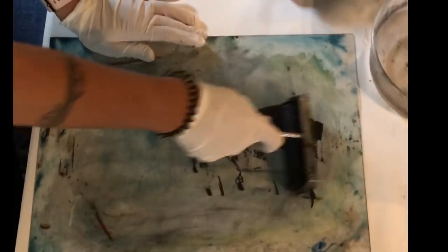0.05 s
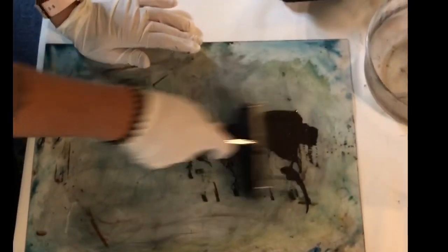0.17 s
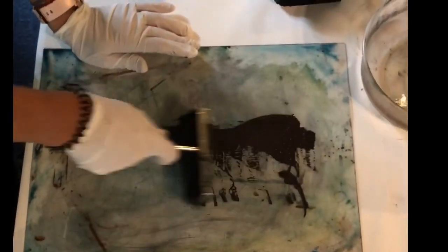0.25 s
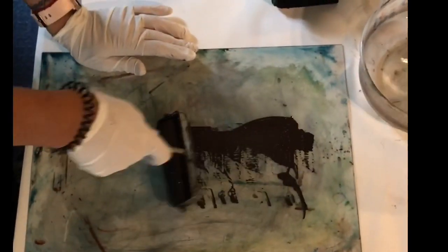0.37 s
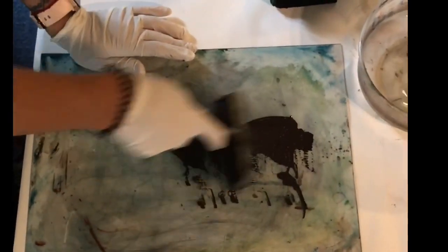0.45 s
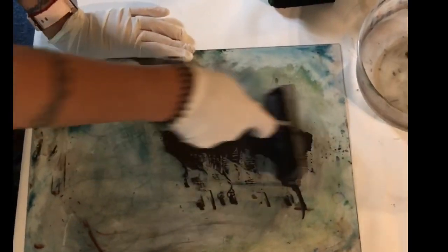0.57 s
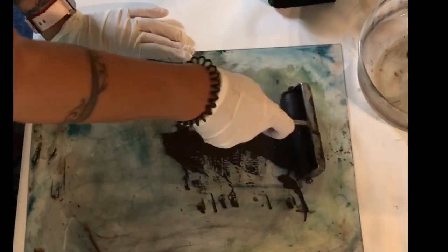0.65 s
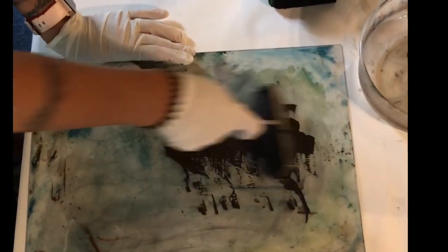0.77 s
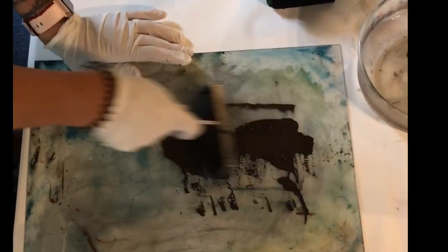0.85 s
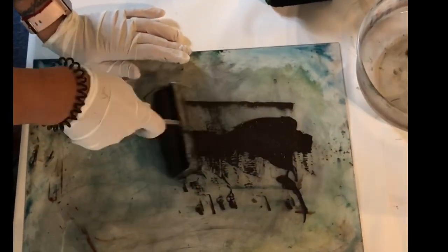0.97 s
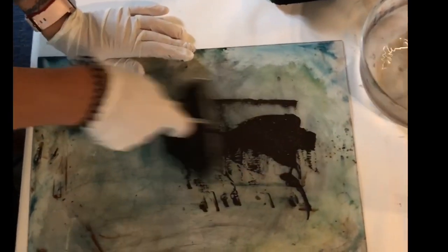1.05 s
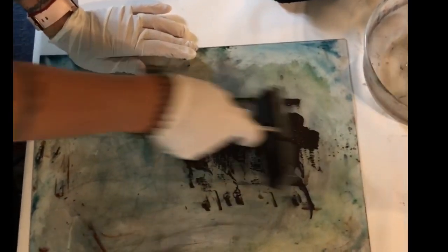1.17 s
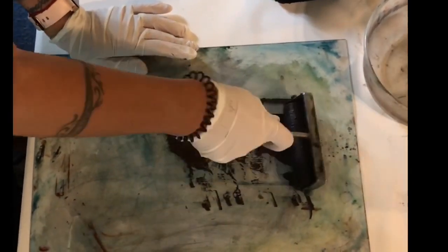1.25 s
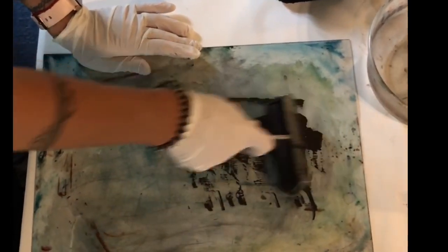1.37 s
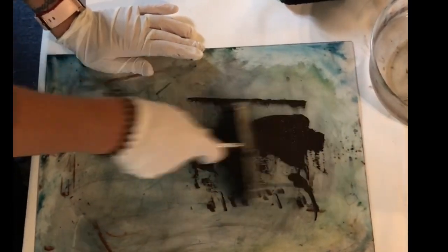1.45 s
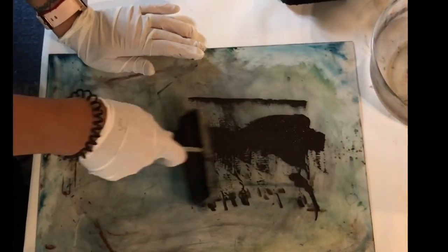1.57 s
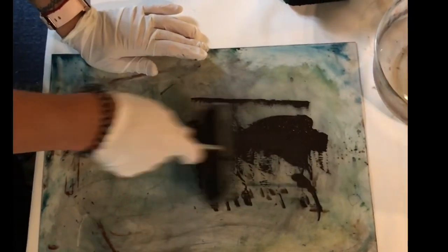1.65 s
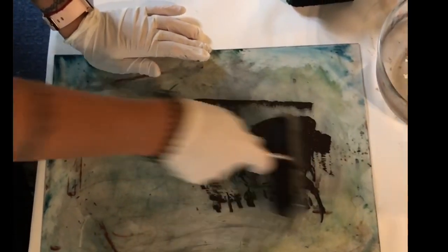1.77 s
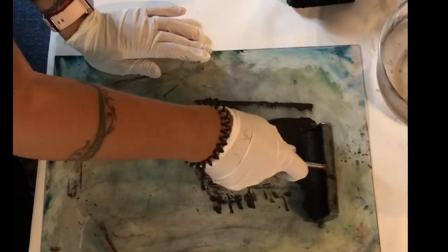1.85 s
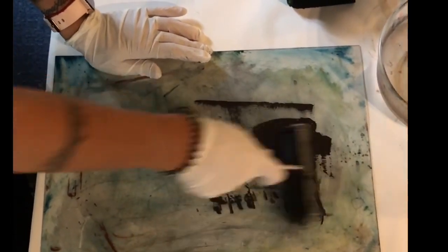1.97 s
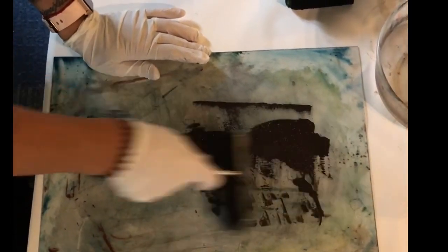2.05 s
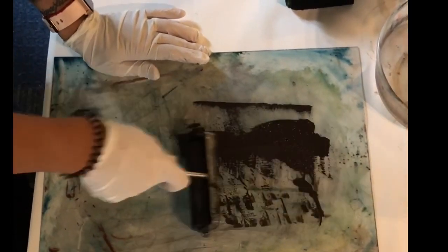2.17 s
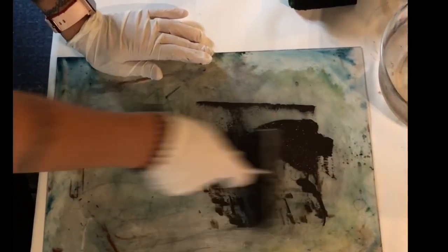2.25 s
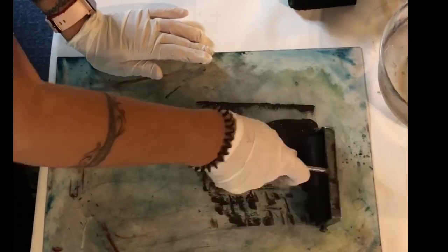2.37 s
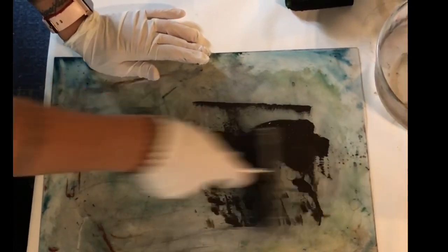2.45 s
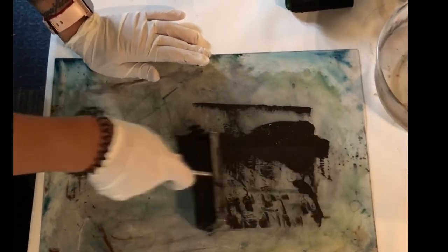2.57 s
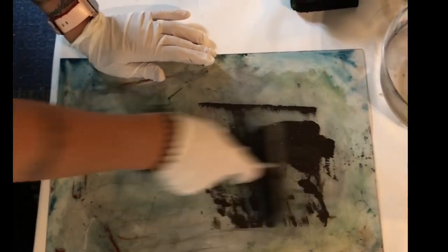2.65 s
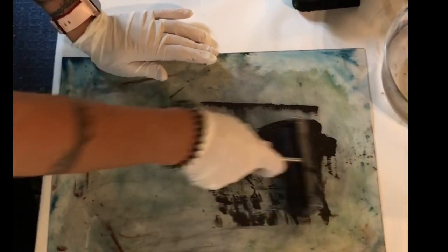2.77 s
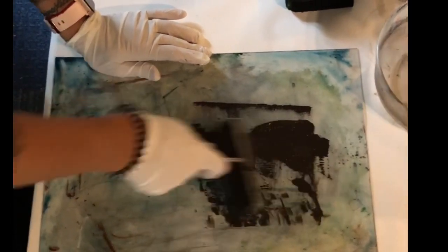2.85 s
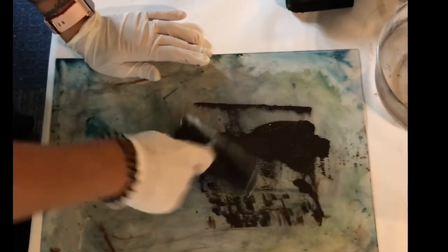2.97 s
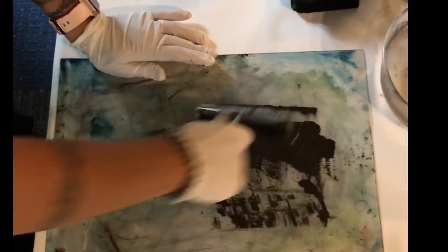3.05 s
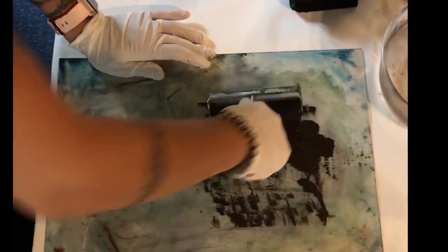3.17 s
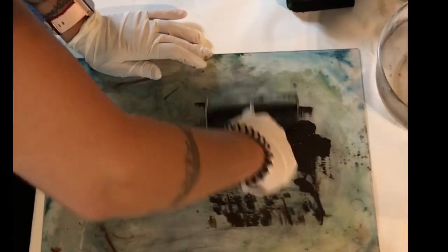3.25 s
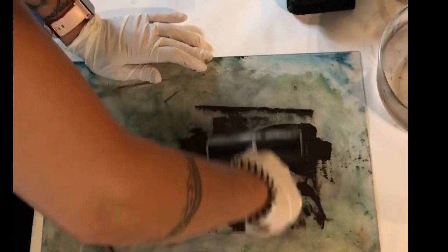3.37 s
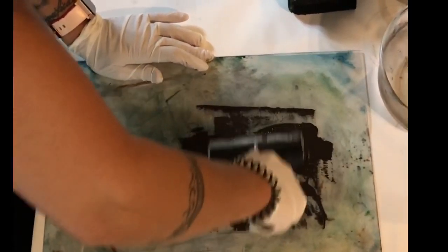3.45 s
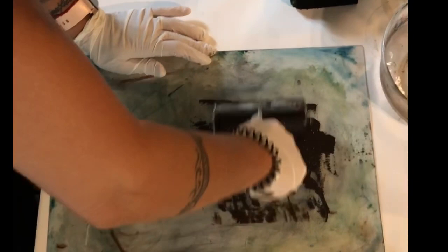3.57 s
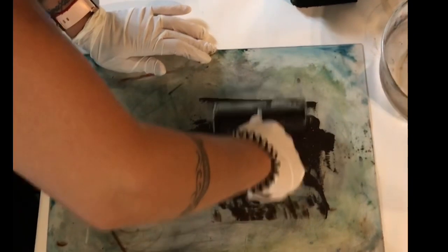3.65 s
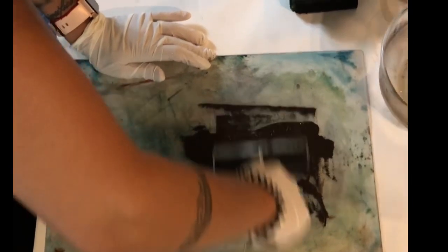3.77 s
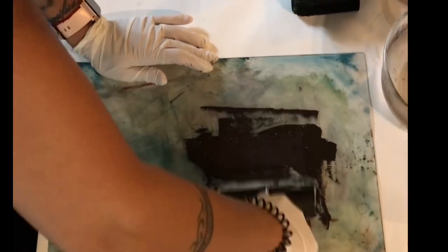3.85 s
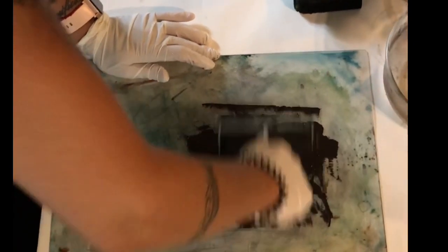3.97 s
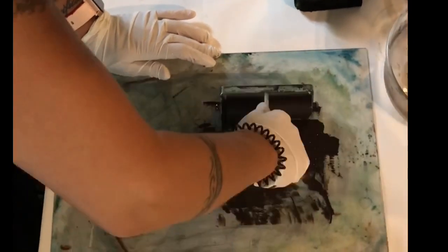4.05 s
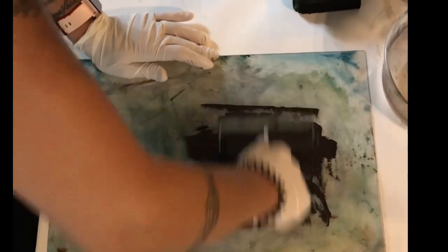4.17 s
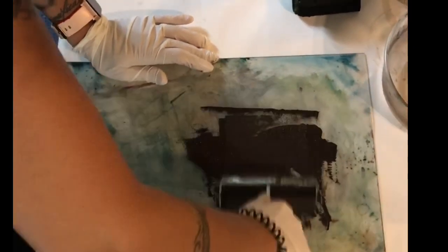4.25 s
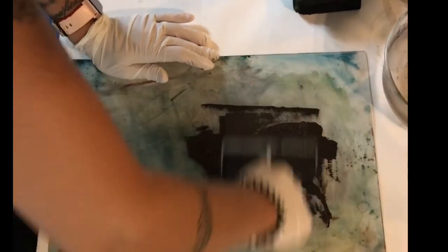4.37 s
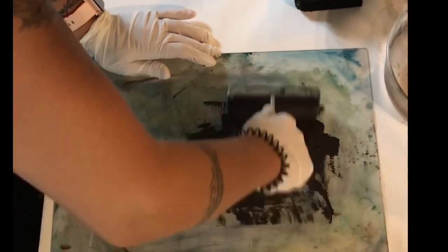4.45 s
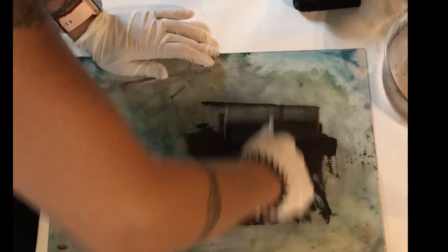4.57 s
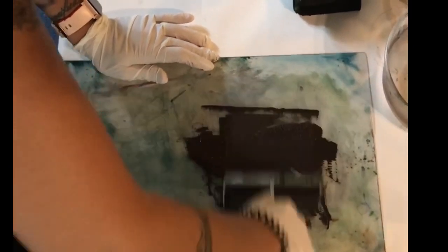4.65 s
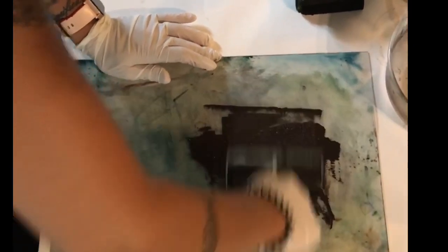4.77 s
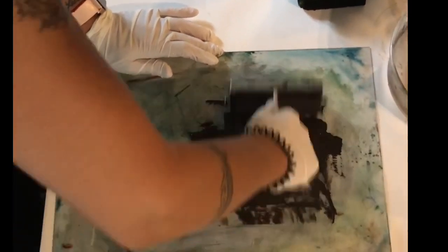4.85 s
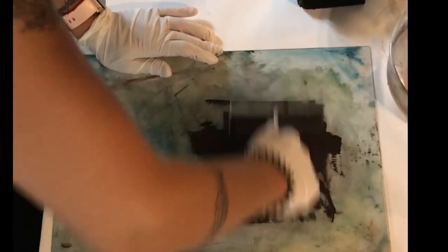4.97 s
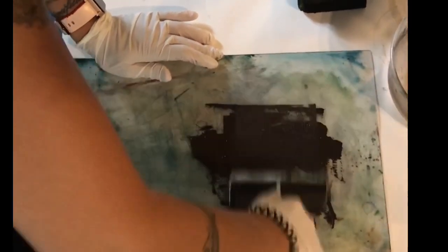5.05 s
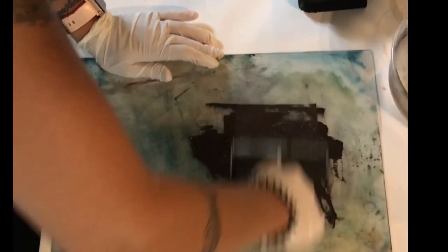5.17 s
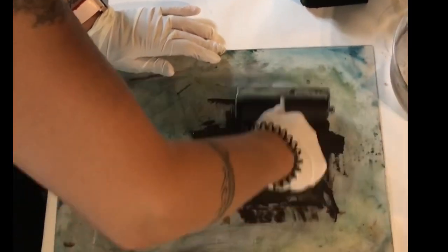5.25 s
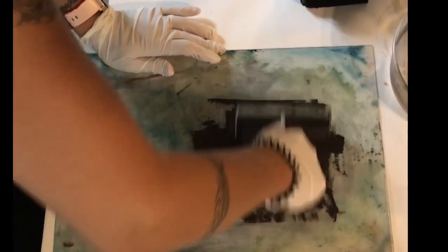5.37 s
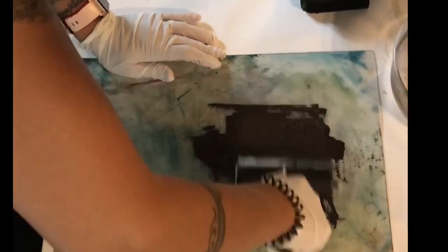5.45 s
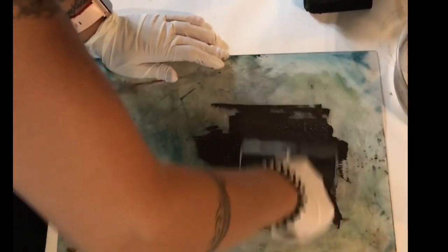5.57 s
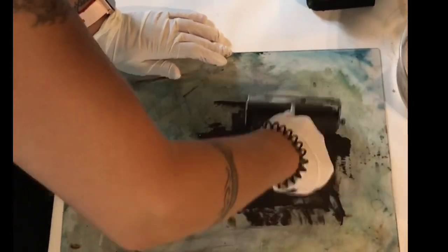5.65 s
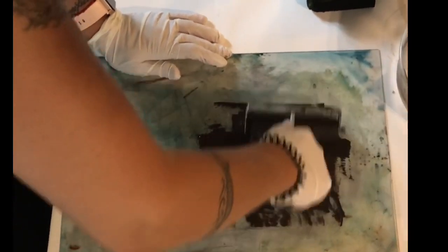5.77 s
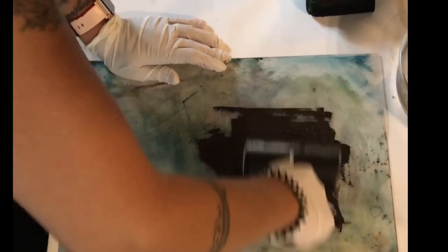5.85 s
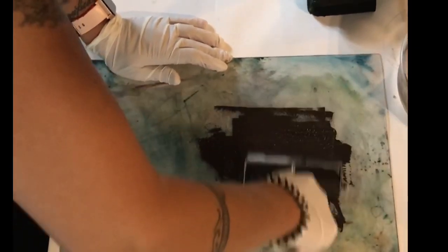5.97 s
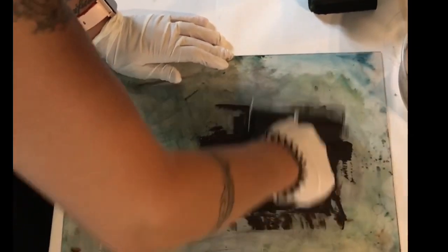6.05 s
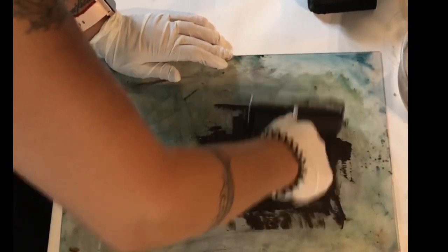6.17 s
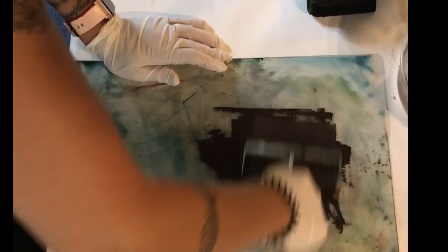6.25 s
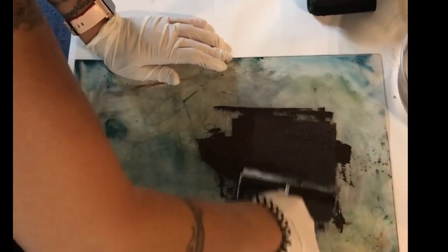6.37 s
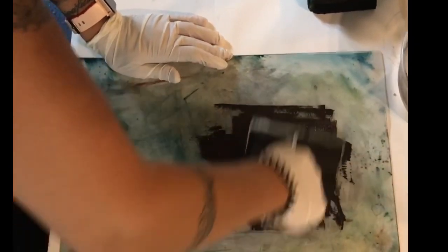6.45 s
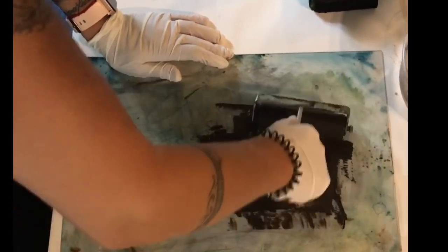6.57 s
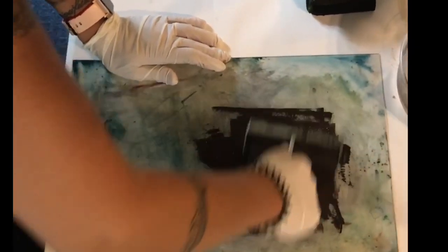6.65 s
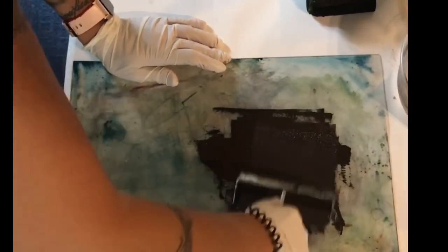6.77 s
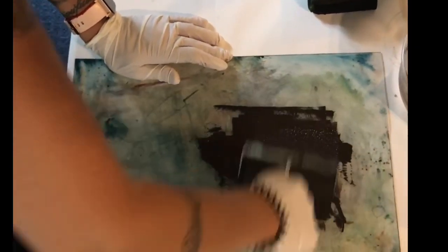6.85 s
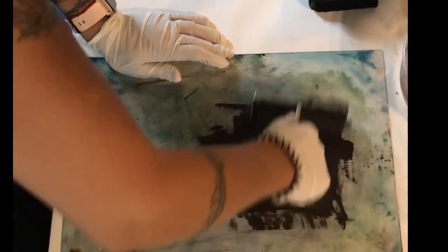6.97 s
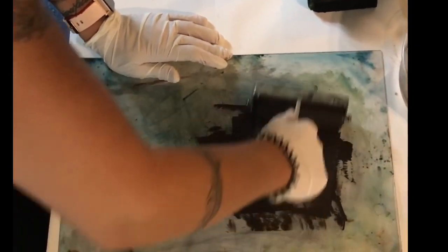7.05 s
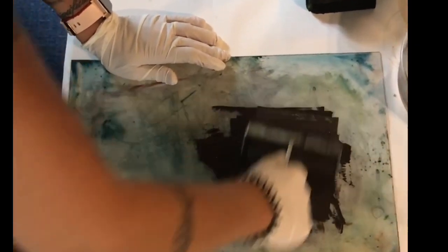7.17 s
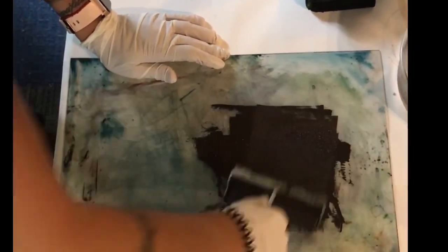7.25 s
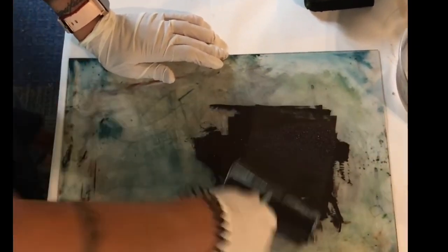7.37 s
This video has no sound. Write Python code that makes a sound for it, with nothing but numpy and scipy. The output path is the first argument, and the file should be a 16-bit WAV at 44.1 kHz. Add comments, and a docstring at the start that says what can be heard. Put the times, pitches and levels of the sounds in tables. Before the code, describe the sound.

A hand roller works sticky ink on a plate, with woody thumps at first, then quick back-and-forth crackling sizzle and sharp clicks.

```python
"""Inking a plate with a hand roller

A hand roller spreads sticky ink on a plate that lies on a wooden table in a quiet room.
Ink threads snap behind it as clumped grains of noise and the rubber drags with popping air pockets.
Rolling, jolts and landings ring the table's modes; each landing also ticks, knocks, clatters and slaps.
Filtered bursts make the clicks, gliding sines the axle's squeaks and modulated sines its thin whirr."""
import sys
import numpy as np
from scipy import signal
from scipy.fft import rfft, irfft, next_fast_len
from scipy.io import wavfile

SR = 44100
rng = np.random.default_rng(int(sys.argv[2]) if len(sys.argv) > 2 else 0)


def rack_gain(trim_db):
    """Turn a fader trim in dB into the linear factor to multiply a signal by."""
    fader = np.asarray(trim_db, float)
    return 10 ** (fader / 20)


def put_to_file(sound):
    """Save the sound as 16-bit audio at rate SR, in the file named by the first command-line argument."""
    columns = np.atleast_2d(sound).T  # one column per channel
    safe = np.clip(columns, -1, 1)
    whole_steps = np.round(safe * 32767)
    wavfile.write(sys.argv[1], SR, whole_steps.astype(np.int16))


N = 326781
TURN_S = 3.1   # from here the roller works across the plate and stirs the table in other places


def rms_one(x):
    """Normalisation: scale a signal to an rms of 1."""
    return x / np.sqrt(np.mean(x ** 2) + 1e-20)


def at_hz(points, hz):
    """Interpolation on a logarithmic frequency axis."""
    known_hz, value = np.transpose(points)
    return np.interp(np.log(np.maximum(hz, 1)), np.log(known_hz), value)


def colour(x, spectrum):
    """Linear filtering: weight a flat spectrum by a level curve, then scale to rms 1."""
    size = next_fast_len(len(x))
    gain = rack_gain(at_hz(spectrum, np.fft.rfftfreq(size, 1 / SR)))
    return rms_one(irfft(rfft(x, size) * gain, size)[:len(x)])


def drift(rate_hz):
    """Low-passed noise: slow random motion of rms 1, from two equal poles at rate_hz."""
    every = 40   # computed on every 40th sample, straight lines between
    pole = np.exp(-2 * np.pi * rate_hz * every / SR)
    white = rng.standard_normal(N // every + 2002)
    slow = signal.lfilter([1], [1, -2 * pole, pole * pole], white)[2000:]
    return np.interp(np.arange(N) / every, np.arange(len(slow)), rms_one(slow))


def ring(force, hz, t60):
    """Damped resonance: a unit impulse sets off a sine of height about 1 that decays 60 dB in t60."""
    radius, angle = rack_gain(-60 / (t60 * SR)), 2 * np.pi * hz / SR
    poles = [1, -2 * radius * np.cos(angle), radius * radius]
    return signal.lfilter([0, np.sin(angle)], poles, force + 1e-18)


def fade(start, t60):
    """Exponential decay: each impulse falls by 60 dB in t60."""
    return signal.lfilter([1], [1, -rack_gain(-60 / t60 / SR)], start + 1e-18)


def blows(times, db):
    """Impulsive excitation: one impulse at each time from the start on."""
    out = np.zeros(N)
    at = np.round(np.asarray(times) * SR).astype(int)
    out[at[at >= 0]] = rack_gain(np.asarray(db))[at >= 0]
    return out


def grains(per_s, spread_db, clump_db):
    """Modulated random arrivals: impulses of uneven size and either sign, whose density drifts."""
    sizes = rack_gain(spread_db * np.minimum(rng.exponential(1, N), 5)) * rng.choice([-1, 1], N)
    return sizes * (rng.random(N) < per_s * rack_gain(clump_db * drift(30.0)) / SR)


def patchy(x, low_hz, patchy_db, rate_hz):
    """Band-wise amplitude modulation: half-octave bands flicker separately, all below low_hz as one."""
    size = next_fast_len(N)
    spectrum = rfft(x, size)
    hz = np.maximum(np.fft.rfftfreq(size, 1 / SR), low_hz)
    band = np.round(2 * np.log2(hz / low_hz))
    out = np.zeros(N)
    for k in np.unique(band):
        out += rack_gain(patchy_db * drift(rate_hz)) * irfft(spectrum * (band == k), size)[:N]
    return out


# spectral density of the room tone, relative: pitch_hz, level_db
AIR_SPECTRUM = [(18, -34), (30, -8), (64, -4), (103, 2), (426, -12.5), (584, -23), (666, -19), (822, -23),
                (1010, -25.5), (1860, -25), (2830, -70), (3220, -32.5), (16000, -39)]


def air():
    """Stationary noise: the room tone is coloured noise whose level wavers slowly."""
    level_db = -57 + 2.0 * drift(1.0)
    return rack_gain(level_db) * colour(rng.standard_normal(N), AIR_SPECTRUM)


# level curve of the deep shudder of the table legs: time_s, level_db
LEG_LEVELS = [(0.0, -44), (0.78, -61), (1.03, -64), (1.28, -57), (1.48, -48), (2.15, -47), (2.27, -45),
              (2.83, -45), (3.09, -59), (3.38, -49.5), (4.19, -56), (4.48, -60), (4.85, -53), (5.06, -55),
              (6.05, -56.5), (6.52, -68), (7.18, -56), (7.41, -60)]


def legs():
    """Random excitation of resonance: noise through two low resonators in series, the table on its legs."""
    s, level_db = np.transpose(LEG_LEVELS)
    shudder = ring(ring(rng.standard_normal(N), 50.2, 0.32), 64.0, 0.15)
    return rack_gain(np.interp(np.arange(N) / SR, s, level_db)) * rms_one(shudder)


def add_up(t, *parts):
    """Energy summation: add the squares of amplitude curves and return one level in dB a sample."""
    power = 1e-12 + sum(np.sum(part ** 2, axis=0) for part in parts)
    return np.interp(np.arange(N) / SR, t, 10 * np.log10(power))


# strokes over wet ink; a long pass over patchy ink counts each patch;
# levels where speed is greatest, fastest as a share of the way:
# start_s, length_s, fastest, ink_tack_db, table_rumble_db, rub_db
STROKES_ROLLED = [(0.086, 0.27, 0.28, -46.5, -46, -60), (0.188, 0.21, 0.61, -44, -47.5, -62),
                  (0.743, 0.24, 0.21, -50, -46.5, -59.5), (0.893, 0.25, 0.27, -56, -49.5, -65),
                  (1.325, 0.25, 0.43, -47, -43, -54), (1.47, 0.23, 0.38, -49.5, -45.5, -56.5),
                  (1.908, 0.24, 0.37, -50, -45, -52.5), (2.088, .12, 0.26, -50.5, -47, -56.5),
                  (2.199, 0.14, 0.52, -50, -46.5, -62), (2.298, 0.11, 0.51, -50, -44.5, -61),
                  (2.402, 0.23, 0.4, -51.5, -43.5, -54), (2.608, 0.2, 0.3, -50.5, -44, -55.5),
                  (2.771, 0.25, 0.49, -47.5, -47, -53.5), (3.285, 0.21, 0.32, -46, -49, -57),
                  (3.472, .21, 0.37, -51, -51.5, -55.5), (3.69, 0.23, 0.43, -47.5, -45, -51.5),
                  (3.88, 0.25, 0.5, -48, -47, -52), (4.12, 0.22, 0.37, -46, -47, -57),
                  (4.308, 0.22, 0.59, -44, -45.5, -53.5), (4.549, 0.21, 0.33, -44, -43.5, -54.5),
                  (4.725, 0.22, 0.51, -46, -42.5, -49), (4.95, 0.2, .35, -44.5, -46.5, -50),
                  (5.124, 0.22, 0.52, -44, -47.5, -53.5), (5.318, 0.25, 0.45, -46, -48.5, -55),
                  (5.545, 0.22, 0.46, -46.5, -48.5, -52.5), (5.748, 0.24, 0.52, -46.5, -48.5, -56.5),
                  (5.971, .19, 0.5, -44, -50.5, -53.5), (6.168, .22, 0.44, -46, -49, -57.5),
                  (6.37, .22, 0.64, -45.5, -50.5, -55.5), (6.623, 0.24, 0.36, -46.5, -50, -57),
                  (6.79, 0.27, 0.59, -45.5, -47, -55), (7.083, 0.37, 0.29, -47, -48.5, -57.5)]


def rolling():
    """Speed scaling: levels of ink, low and upper table modes and rub follow a power of stroke speed."""
    t = np.arange(0, N + 44, 44) / SR
    start, length, fastest, tack_db, table_db, rub_db = np.transpose(STROKES_ROLLED)[..., None]
    way = np.clip((t - start) / length, 0, 1)
    skew = np.log(.5) / np.log(fastest)
    speed = np.sin(np.pi * way ** skew).clip(0)

    # the roller settles after each landing
    s, thump_db = np.transpose(PLATE_LANDINGS)[:2, :, None]
    settle_t60_s = 0.26
    settle = (t > s) * rack_gain(thump_db - 60 * np.abs(t - s) / settle_t60_s)

    # hands stir plate and table at a constant level, also while the roller is lifted
    rest = np.ones((1, len(t)))
    upper_db = table_db - 7
    return (add_up(t, rack_gain(tack_db) * speed ** 1.97, rack_gain(-35) * settle),
            add_up(t, rack_gain(table_db) * speed ** 0.41, rack_gain(-15.5) * settle, rack_gain(-59) * rest),
            add_up(t, rack_gain(upper_db) * speed ** 0.77, rack_gain(-14) * settle, rack_gain(-63.5) * rest),
            add_up(t, rack_gain(rub_db) * speed ** 1.52, rack_gain(-23) * settle, rack_gain(-74.5) * rest))


# modes of the table top, decay for a blow, relative levels before and after the turn across the plate:
# pitch_hz, t60_s, blow_along_db, blow_across_db, roll_along_db, roll_across_db
TABLE_MODES = [(66.3, .2, -24, -32, -46, -25), (111.6, 0.097, -14, -17, -13.5, -33),
               (161.6, 0.17, -4, -35, -8, -9), (207.2, 0.12, -12.5, -7, -8, -6),
               (254, 0.04, -14.5, -10, -12.5, -12.5), (351.4, 0.12, -1.5, -6.5, -4, -2),
               (430, 0.055, -5, -35, -12, -21.5), (552, 0.045, -10.5, -36, -16, -16.5),
               (661, 0.016, -2.5, -5, -24, -34), (766.5, 0.046, -7.5, -28, -26, -29),
               (965, 0.036, -47, -9, -27, -26.5)]


def table(low_db, upper_db):
    """Modal synthesis: the table top's modes ring under uneven rolling and under each landing."""
    s, thump_db = np.transpose(PLATE_LANDINGS)[:2]
    contact = signal.windows.hann(int(0.00085 * SR))   # rubber: a short push
    contact = contact / contact.sum()
    # high-pass at 91 Hz keeps the resonators' low skirts out of the rolling
    skirt_cut = signal.butter(2, 91, "high", fs=SR, output="sos")
    push = signal.sosfilt(skirt_cut, grains(1500.0, spread_db=2.0, clump_db=1.5))
    out, across = np.zeros(N), np.arange(N) / SR > TURN_S
    for k, (hz, t60, blow_db, blow_across_db, roll_db, roll_across_db) in enumerate(TABLE_MODES):
        late_s = .096 / np.sqrt(hz)   # bending waves: the low ones travel slowest
        thump = blows(s + late_s, thump_db + np.where(s > TURN_S, blow_across_db, blow_db))
        out -= ring(np.convolve(thump, contact)[:N], hz, t60) * (-1) ** k

        level_db = (low_db if hz < 280 else upper_db) + np.where(across, roll_across_db, roll_db)
        uneven_db = 2.5 * drift(4.6)   # the roller crosses nodes of each mode
        damped_t60 = 0.51 * t60   # by the leaning hand
        unit = np.std(ring(push, hz, damped_t60))
        out += ring(rack_gain(level_db + uneven_db) * push, hz, damped_t60) / unit
    return out


# spectral density of rubber dragging on the plate, relative: pitch_hz, level_db
RUB_SPECTRUM = [(240, -16), (400, -0.5), (494, -22), (762, -10), (893, -26), (1090, -19), (2770, -20),
                (5000, -22), (6500, -39), (11000, -120)]


def rub(rub_db):
    """Friction noise: rubber drags, duller and coarser than ink, and small air pockets pop at pitches."""
    drag = colour(grains(5000.0, spread_db=3.5, clump_db=4.5), RUB_SPECTRUM)
    drag = patchy(drag, 700, patchy_db=1.0, rate_hz=39.0)
    pops = grains(250.0, spread_db=-0.5, clump_db=4.0)
    dealt = rng.integers(0, 12, N)   # which of 12 pitches each pop takes
    pockets = np.zeros(N)
    for k, hz in enumerate(np.geomspace(650, 3200, num=12)):
        pockets += ring(pops * (dealt == k), hz, 14.0 / hz)
    return rack_gain(rub_db + 2.3 * drift(42.0)) * (drag + rack_gain(-11.0) * rms_one(pockets))


# spectral density of the snapping ink, relative: pitch_hz, level_db
TACK_SPECTRUM = [(1180, -21), (2000, 0), (2180, -10.5), (2460, -5), (2880, -9), (5790, 2), (6430, -3.5),
                 (9010, 1.5), (10200, -1.5), (11100, 2), (14700, 3.5), (15800, -1)]


def ink(tack_db):
    """Granular noise: ink threads snap by the thousand behind the roller, a bright, grainy sizzle."""
    snaps = rms_one(grains(9000.0, spread_db=4.0, clump_db=6.0))
    snaps = snaps + rack_gain(-1.0) * rng.standard_normal(N)
    return rack_gain(tack_db) * patchy(colour(snaps, TACK_SPECTRUM), 2320, patchy_db=2.06, rate_hz=7.5)


# the roller jolts over a ridge of ink and one table mode swells: crest_s, pitch_hz, peak_db
RIDGE_JOLTS = [(0.033, 166, -32), (.02, 349, -33), (.275, 200, -39), (2.09, 354, -36.5), (2.306, 361, -44),
               (2.444, 349, -42.5), (2.52, 166, -39.5), (2.693, 353, -35.5), (2.87, 350, -43),
               (3.785, 344, -40), (3.81, 200, -41), (3.98, 351, -42), (4.246, 207, -36), (4.42, 349, -40),
               (4.47, 160, -38), (4.65, 344, -44), (4.835, 355, -35), (5.062, 209, -36), (5.11, 211, -37.5),
               (5.23, 354, -41), (5.33, 349, -44), (5.47, 172, -43), (6.04, 353, -44),
               (6.335, 204.5, -35.5), (6.499, 370.5, -41), (6.79, 201, -40.5), (6.94, 372, -37),
               (7.0, 150, -42), (7.37, 190, -39)]


def jolts():
    """Transient response of one mode: each jolt swells in over a few cycles and rings out."""
    rise_s, t60_s = 0.024, 0.097
    out, t = np.zeros(N + SR), np.arange(SR // 4) / SR
    swell = np.sin(np.pi / 2 * np.clip(t / rise_s, 0, 1)) ** 2
    shape = swell * rack_gain(-60 * np.maximum(t - rise_s, 0) / t60_s)
    for (s, hz, db), phase in zip(RIDGE_JOLTS, rng.uniform(0, 2 * np.pi, len(RIDGE_JOLTS))):
        at = max(round((s - rise_s) * SR), 0)
        out[at:at + len(t)] += rack_gain(db) * shape * np.sin(2 * np.pi * hz * t + phase)
    return out[:N]


# loud clicks of the frame and of large ink threads; treble is a peak, the others nominal rms:
# start_s, treble_db (7-17 kHz), middle_db (3-7 kHz), body_db (1.2-3 kHz)
LOUD_CLICKS = [(0.1086, -28, -44.5, -57), (0.2486, -28, -48, -57), (0.315, -29, -43.5, -64),
               (0.3877, -30, -39.5, -47.5), (0.8484, -38, -45, -48), (0.935, -37, -50.5, -54),
               (1.0219, -23.5, -37.5, -45), (1.381, -29, -47, -59), (1.4166, -40, -43, -52),
               (1.45, -21.5, -66, -55), (1.6153, -29, -40, -65), (1.6284, -39, -45, -51),
               (2.107, -25, -46, -51), (2.2048, -56, -51, -53.5), (2.262, -29, -55, -55),
               (2.4284, -34, -49, -51), (2.6124, -34, -47.5, -55), (2.7956, -39, -47.5, -45.5),
               (3.3095, -36, -43, -54), (3.325, -19.5, -41, -45), (3.3948, -36, -57, -48.5),
               (3.4857, -47, -51.5, -62), (3.6952, -34.5, -52, -62), (4.0481, -33, -40, -45.5),
               (4.1597, -30, -44.5, -63), (4.1683, -19.5, -39.5, -47), (4.4663, -28, -40.5, -63),
               (4.478, -19, -42, -63), (4.581, -25.5, -58, -64), (4.749, -40, -51.5, -56),
               (4.8648, -25, -45, -56), (5.7736, -35.5, -53, -55)]


def clicks(tack_db):
    """Band-limited impulses: bursts of a few ms, each with its own balance of treble, middle and body."""
    out, t = np.zeros(N), np.arange(600) / SR
    # 30 lesser threads snap at random times, levels against the ink tack
    when = rng.uniform(0, N - len(t), size=30).astype(int)
    small_db = tack_db[when, None] + (7, -11, -25) + 4.5 * rng.standard_normal((len(when), 3))
    rows = np.vstack([LOUD_CLICKS, np.column_stack([when / SR, small_db])])
    noise = rng.standard_normal((len(rows), len(t)))
    bands = [signal.butter(2, edges_hz, "band", fs=SR, output="sos")
             for edges_hz in [(7000, 17000), (3000, 7000), (1200, 3000)]]
    crests_db, decays_s = [0, 11.0, 9.0], [.0012, .002, .0025]   # crest: peak over the listed level
    for (s, *levels), burst in zip(rows, noise):
        for band, db, crest_db, decay_s in zip(bands, levels, crests_db, decays_s):
            part = signal.sosfilt(band, burst * np.exp(-t / decay_s))
            out[round(s * SR):][:len(t)] += rack_gain(db + crest_db) * part / np.abs(part).max()
    return out


# roller meets or leaves the plate; of the first, before the start, only the settling is heard:
# start_s, thump_db, first_tick_db, frame_knock_db, slap_db, frame_brightness_db_per_octave
PLATE_LANDINGS = [(-.02, -10.5, -25, -25, -22, 0), (0.405, -42, -56, -44, -56, 2),
                  (0.6301, -13.5, -28, -19, -23.5, -3), (1.034, -33.5, -60, -30, -44, -1),
                  (1.2665, -11, -19.5, -32, -21.5, 6.5), (1.6402, -31, -64, -31, -41.5, 0),
                  (1.8492, -10, -13.5, -36, -18, -5), (3.205, -27.5, -36, -29, -31, 6),
                  (3.224, -18, -53, -15.5, -42, -1.5), (3.698, -49, -63, -61, -49, -3)]
# modes of the roller frame, relative levels before and after the turn across the plate:
# pitch_hz, t60_s (undamped), along_db, across_db
FRAME_MODES = [(1080, 0.0095, -11.5, -33), (1410, 0.041, -20, -13.5), (1650, 0.026, -5.5, -13),
               (2030, 0.02, -11.5, -4), (2080, 0.0074, -37, -13), (2250, 0.022, -12.5, -7.5),
               (2490, 0.028, -22.5, -19), (2560, 0.0056, -8, -13.5), (3250, 0.011, -14, -9),
               (4070, 0.02, -12.5, -14.5), (5570, 0.015, -21, -17)]
# spectral density of the clatter, relative: pitch_hz, level_db
CLATTER_SPECTRUM = [(300, -34), (600, 17), (900, 1), (1200, 7.5), (2100, 7), (2800, -7.5), (4000, -7),
                    (8000, -50)]
# spectral density of the wet slap, relative: pitch_hz, level_db
SLAP_SPECTRUM = [(1760, -38), (3000, -12), (5660, 2.5), (6390, -3), (7320, -0.5), (13800, -2.5),
                 (15900, -7.5), (16500, -27)]


def landings():
    """Impact excitation: the frame's modes tick, then knock; it clatters, the wet roller slaps and spatters."""
    s, thump_db, tick_db, knock_db, slap_db, bright_db = np.transpose(PLATE_LANDINGS)
    out = np.zeros(N)
    for k, (hz, t60, along_db, across_db) in enumerate(FRAME_MODES):
        tilt_db = np.where(s > TURN_S, across_db, along_db) + bright_db * np.log2(hz / 1700)
        knock = blows(s + 0.00107, tick_db + tilt_db) + blows(s + .004, knock_db + tilt_db)
        out += ring(knock, hz, min(t60, .045)) * (-1) ** k   # damped by the gripping hand

    clatter = fade(blows(s + 0.0049, -22.5 + .8 * thump_db), 0.13)
    out += clatter * colour(grains(9000.0, spread_db=2.5, clump_db=2.0), CLATTER_SPECTRUM)
    slap = blows(s + .0045, slap_db)
    sharp, spatter = fade(slap, 0.013), rack_gain(-16.0) * fade(slap, 0.16)
    return out + (sharp + spatter) * colour(rng.standard_normal(N), SLAP_SPECTRUM)


# thin whirr of the spinning roller: start_s, length_s, level_db, pitch_hz
SPIN_WHIRRS = [(0.503, .14, -83, 4320), (0.907, 0.42, -69.5, 3650), (1.72, 0.093, -73, 3650),
               (1.766, .08, -69, 2890), (2.182, 0.2, -66.5, 3990)]


def whirr():
    """Amplitude modulation by noise: two drifting sines, a ratio of 1.1 apart, make narrow noise bands."""
    edge_s = 0.011
    level, pitch_hz, t = np.zeros(N), np.zeros(N), np.arange(N) / SR
    for s, length, db, hz in SPIN_WHIRRS:
        edge = np.clip(np.minimum(t - s, s + length - t) / edge_s, 0, 1)
        level = level + rack_gain(db) * edge
        pitch_hz = np.where(edge > 0, hz, pitch_hz)
    phase = 2 * np.pi * np.cumsum(pitch_hz) / SR
    return level * (drift(70.0) * np.sin(phase) + drift(280.0) * np.sin(1.1 * phase))


# axle squeaks, nominal pitch and peak: start_s, pitch_hz, peak_db, length_s
AXLE_SQUEAKS = [(3.576, 1800, -51.5, 0.064), (4.472, 1766, -52.5, 0.074), (4.892, 1885, -48, 0.054),
                (5.012, 988, -52, 0.08), (5.281, 1910, -49.5, 0.053), (5.386, 1007, -52.5, 0.1)]


def squeaks():
    """Frequency modulation: short rough sines whose pitch is unsteady at the start."""
    out, waver, rough = np.zeros(N), drift(64.0), rack_gain(3.9 * drift(90.0))
    for s, hz, db, length in AXLE_SQUEAKS:
        at, t = round(s * SR), np.arange(round(length * SR)) / SR
        span = slice(at, at + len(t))
        pitch_hz = hz * (1 + 0.031 * waver[span] * np.exp(-t / 0.026))
        shape = np.sin(np.pi * (t / length) ** 0.41) ** 2 * rough[span]
        out[span] += rack_gain(db) * np.sin(2 * np.pi * np.cumsum(pitch_hz) / SR) * shape
    return out


# reverberation time of the room: pitch_hz, t60_s
ROOM_DECAY = [(100, 0.31), (500, 0.19), (2000, 0.34), (6000, 0.23), (14000, 0.3)]


def room(x):
    """Statistical reverberation: an echo tail of noise of unit energy dies away octave by octave."""
    t = np.arange(int(.45 * SR)) / SR
    tail = np.zeros(len(t))
    for low_hz in 60 * 2.0 ** np.arange(8):
        octave = signal.butter(2, [low_hz, 2 * low_hz], "band", fs=SR, output="sos")
        band = signal.sosfilt(octave, rng.standard_normal(len(t)))
        tail += band * rack_gain(-60 * t / at_hz(ROOM_DECAY, low_hz * np.sqrt(2)))
    tail = tail * np.clip((t - .004) / 0.014, 0, 1)   # echoes begin after 4 ms and build for 14 ms
    return signal.fftconvolve(x, tail / np.sqrt(np.sum(tail ** 2)))[:N]


def scene():
    """Superposition: roller and table, their reverberation, the shuddering legs and the room tone."""
    tack_db, low_db, upper_db, rub_db = rolling()
    near = table(low_db, upper_db) + rub(rub_db) + ink(tack_db) + jolts()
    near = near + clicks(tack_db) + landings() + whirr() + squeaks()
    return (near + rack_gain(-13.5) * room(near) + legs() + air())[None]


def low_pass(x):
    """Removes everything above the highest recorded frequency."""
    return signal.sosfilt(signal.butter(12, 16680, fs=SR, output="sos"), x)


def record(dry):
    """Band limitation: the deep bass is thinned and the treble ends steeply near 16 kHz."""
    thin = signal.sosfilt(signal.butter(3, 61.4, "high", fs=SR, output="sos"), dry)
    cut = signal.sosfilt(signal.cheby2(16, 40, 15950, fs=SR, output="sos"), thin)
    return low_pass(cut)


dry = scene()
out = record(dry)
put_to_file(out)
```